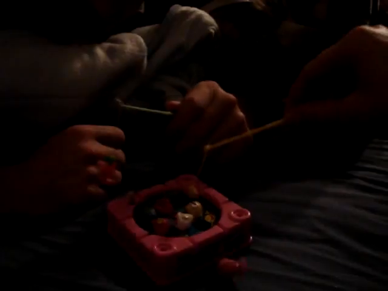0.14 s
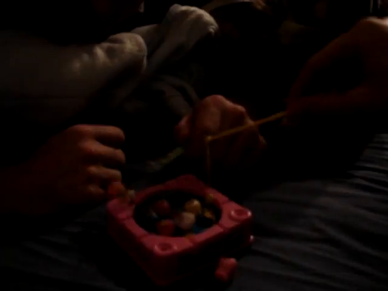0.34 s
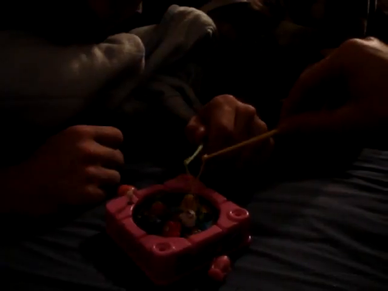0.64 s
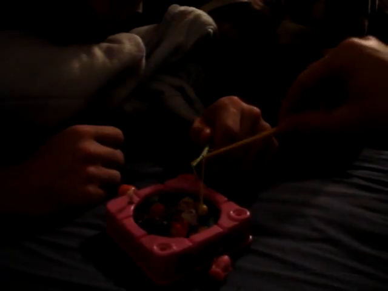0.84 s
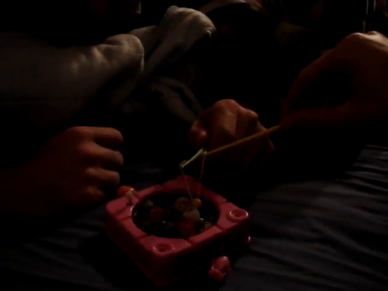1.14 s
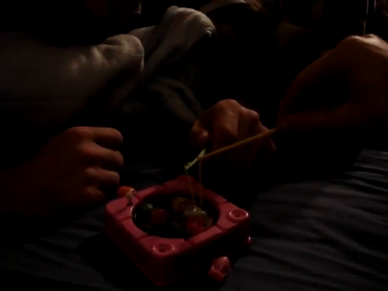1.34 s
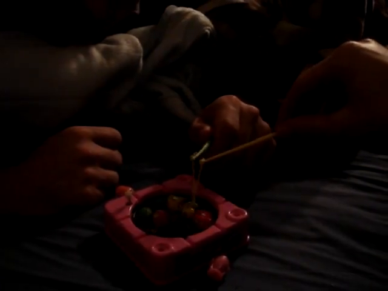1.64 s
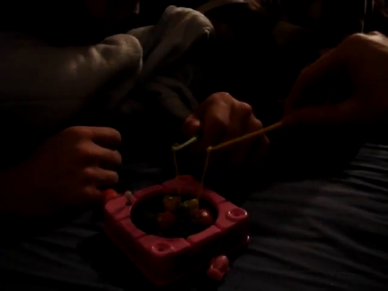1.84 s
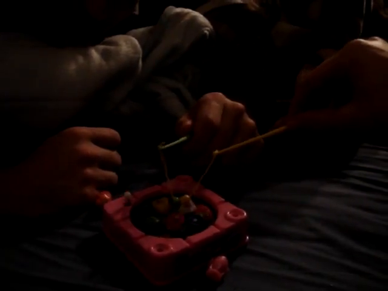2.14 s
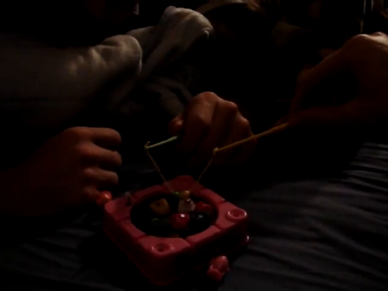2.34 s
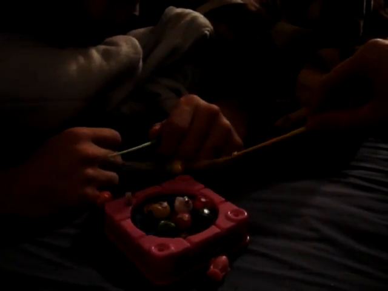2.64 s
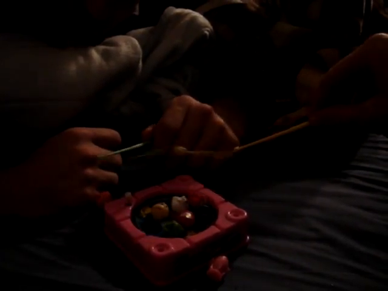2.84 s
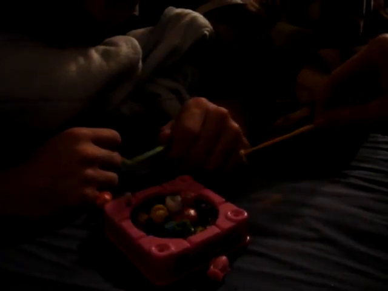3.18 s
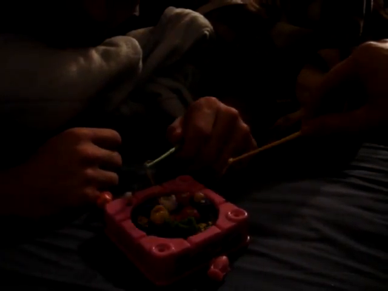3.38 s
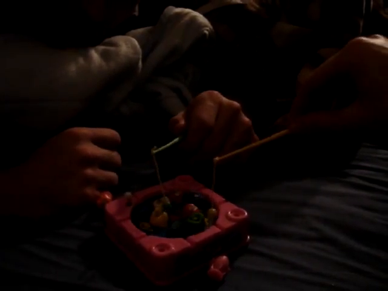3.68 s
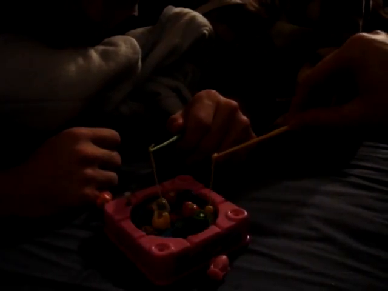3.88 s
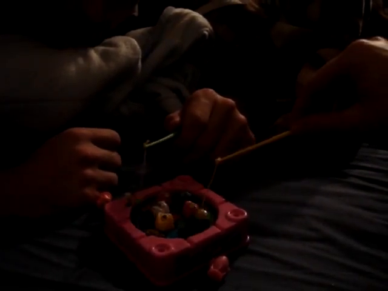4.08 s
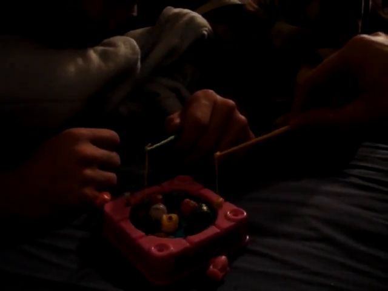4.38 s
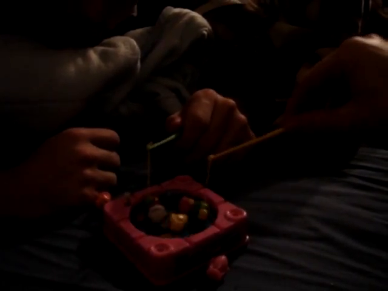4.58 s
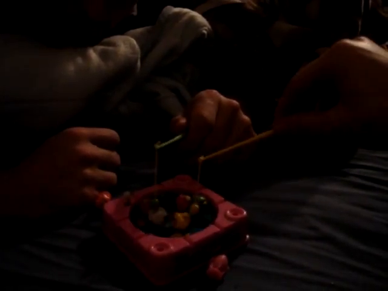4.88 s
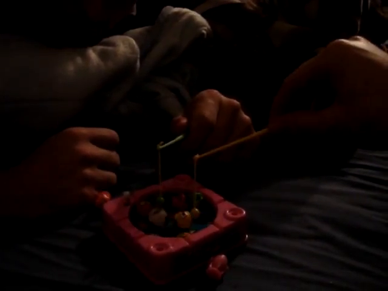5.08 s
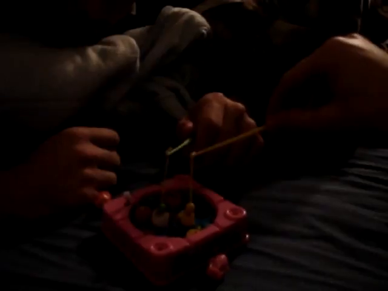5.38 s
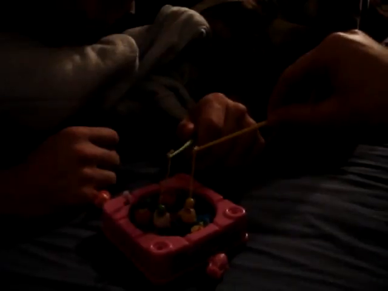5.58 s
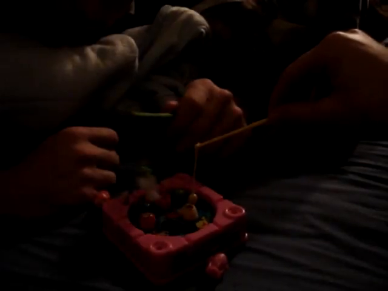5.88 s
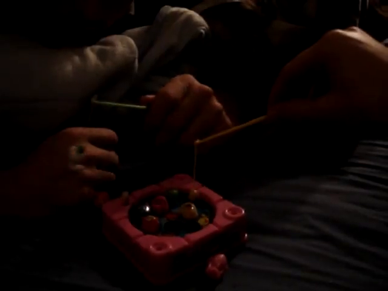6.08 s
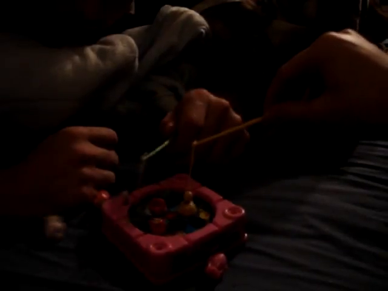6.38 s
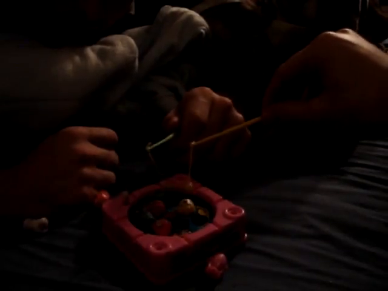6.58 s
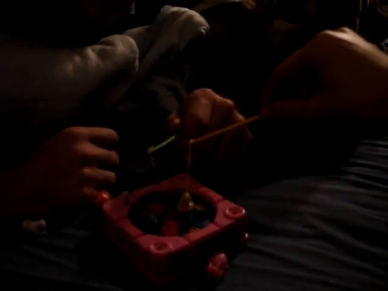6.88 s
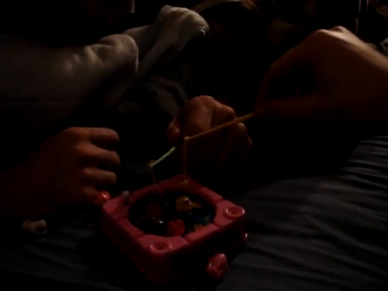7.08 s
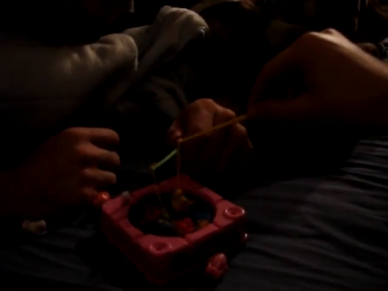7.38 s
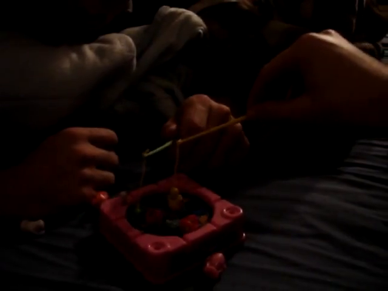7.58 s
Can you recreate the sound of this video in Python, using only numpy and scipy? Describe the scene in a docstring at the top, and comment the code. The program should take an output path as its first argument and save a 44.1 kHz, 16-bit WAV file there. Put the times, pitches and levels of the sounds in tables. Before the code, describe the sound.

Steady clockwork rattle of a small hollow plastic toy, beats so quick they merge into a gritty buzz with scraping gears and shifting metallic-plastic overtones. Toy fish and rods tap the case: a loud clack at once, sparse ticks through the middle, a few taps and a soft bump past six seconds. Close, mono, slightly dulled on top, with a short soft room and very faint hum.

```python
"""A bed in a quiet room, on which a wind-up plastic fishing toy runs.
Its spring motor is braked by a pallet that rattles against a toothed wheel about 150 times a second:
each beat is an impulse that rings the hollow case and the pond, modelled as banks of resonances.
Gears scrape between the beats as noise through resonances; further resonances swell and glide for a while.
Plastic fish and rods click on the turning pond as struck modes; below lie a rumble and a faint mains hum."""
import sys
import numpy as np
from scipy import signal
from scipy.fft import rfft, irfft, next_fast_len
from scipy.io import wavfile
from scipy.ndimage import uniform_filter1d

SR = 44100
rng = np.random.default_rng(int(sys.argv[2]) if len(sys.argv) > 2 else 0)


def unload_wav(signal):
    """Save mono or channel-first audio to the path in sys.argv[1] as 16-bit WAV at rate SR, clipped to [-1, 1]."""
    wavfile.write(
        sys.argv[1],
        SR,
        np.round(np.clip(np.atleast_2d(signal).T, -1, 1) * 32767).astype(np.int16),
    )


N = 340893
TIME = np.arange(N) / SR

# teeth that catch the pallet hard: (time [s], peak level [dB])
SNAG_EVENTS = [(0.722, -12), (1.6627, -9), (1.6998, -12), (1.724, -9.5), (2.1338, -9.5), (3.2042, -9.5),
               (4.0294, -11.5), (4.0517, -10), (4.542, -9.5), (5.6241, -12), (5.7772, -13), (6.314, -10),
               (7.2972, -12)]

# rms waver of the hum and of the drone, and its rate
HUM_WAVER_DB, HUM_WAVER_HZ = 2.5, 2.7
# rms wander of the motor's pace, and its rate
WANDER_BEATS_PER_S, WANDER_HZ = 2.5, 14
# alternate beats differ in force and timing (each way from the mean), every third one is accented
TICK_TOCK_DB, THIRD_TOOTH_DB, LIMP_S = 1.2, .9, .00006
# change of level for each beat per second above or below the mean pace
PALLET_SWING_DB, TEETH_SWING_DB, POND_SWING_DB, CASE_SWING_DB = .13, .12, .11, .07
TEETH_SWING_TOP = 16  # beats per s; in a faster surge the gears get no louder
# rms flutter of the level, and its rate
PALLET_FLUTTER_DB, TEETH_FLUTTER_DB, FLUTTER_HZ = 1.3, 1.5, 45
PALLET_WIDTH_HZ, PALLET_SCATTER_HZ, PALLET_CHATTER_DB = 640, 45, -6
GEAR_WIDTH_HZ, GEAR_DB, OTHER_TEETH_DB = 770, -4, -0.5
ECHO_CUT_HZ = 5200  # soft surfaces return little treble
ROOM_T60_S, ROOM_DB = .25, -13  # decay time of the tail; its level ahead of the treble loss
CUTOFF_HZ = 10080


def from_db(db):
    """Amplitude ratio of a level: 20 dB is a factor of ten."""
    return 10 ** (np.asarray(db) / 20)


def rms_one(x):
    """Normalise the mean power: scale to unit rms."""
    return x / np.sqrt(np.mean(x ** 2) + 1e-20)


def in_time(rows):
    """Linear interpolation of each column of a (time, values...) table at every sample."""
    s, *columns = np.transpose(rows)
    return [np.interp(TIME, s, column) for column in columns]


def clicks(times, sizes):
    """Ideal impulses: one sample of force at each given time."""
    return np.bincount(np.clip(times * SR, 0, N).astype(int), sizes, N + 1)[:N]


def response(modes, size=4096):
    """Minimum-phase impulse response of a set of resonances: it rings at once; unit energy."""
    bins = np.fft.rfftfreq(size, 1 / SR)
    power = sum(from_db(db) ** 2 / (1 + (2 * (bins - hz) / width) ** 4) for hz, width, db in modes)
    # folding the cepstrum onto positive time gives minimum phase
    cepstrum = irfft(np.log(power + 1e-9) / 2)
    cepstrum[1:size // 2] *= 2
    cepstrum[size // 2 + 1:] = 0
    ring = irfft(np.exp(rfft(cepstrum)))
    return ring / np.linalg.norm(ring)


def resonate(x, modes):
    """Linear response of a set of resonances: the force convolved with their impulse response."""
    return signal.oaconvolve(x, response(modes))[:len(x)]


def swept(x, hz, width):
    """Heterodyne resonance whose centre may move; about equal energy at any width."""
    carrier = np.exp(2j * np.pi * np.cumsum(hz * np.ones(N)) / SR)
    lowpass = signal.butter(2, width / 2, fs=SR, output="sos")
    body = signal.sosfilt(lowpass, x / carrier + 1e-18)
    return (body * carrier).real / np.sqrt(width)


def shaped_noise(spectrum):
    """Spectral shaping of white noise, with levels interpolated over log frequency; rms 1."""
    hz, db = np.transpose(spectrum)
    size = next_fast_len(N, True)
    bins = np.maximum(np.fft.rfftfreq(size, 1 / SR), 1e-3)
    gain = from_db(np.interp(np.log(bins), np.log(hz), db))
    white = rng.standard_normal(size)
    return rms_one(irfft(rfft(white) * gain, size)[:N])


def drift(hz):
    """Band-limited random modulation with little much faster than hz; rms 1."""
    return shaped_noise([(hz / 10, -20), (hz / 2, 0), (hz, 0), (hz * 2, -20), (hz * 10, -120)])


def chatter(hits, rise_s, fall_s):
    """Multiple contact: each hit sets off a burst of tiny contacts that builds and dies; rms 1."""
    burst = hits + 1e-18
    for seconds in (rise_s, fall_s):
        burst = signal.lfilter([1], [1, -np.exp(-1 / (seconds * SR))], burst)
    return rms_one(burst * rng.choice([-1, 1], N))


def even(x):
    """Steady power supply: the spring's even pull keeps the power near 1 over many beats."""
    return x / np.sqrt(np.abs(uniform_filter1d(x ** 2, size=4000)) + 1e-9)


def blow(modes, grit_s, grit_db, size=4000):
    """Impact excitation: a sharp contact and a little dying grit ring the modes; peak 1."""
    grit = rng.standard_normal(size) * np.exp(-np.arange(size) / SR / grit_s)
    force = from_db(grit_db) * grit / np.linalg.norm(grit)
    force[0] += 1
    sound = resonate(force, modes)
    return sound / np.abs(sound).max()


def add(out, s, sound):
    """Superposition: mix a short sound in at time s."""
    start = max(round(s * SR), 0)
    out[start:start + len(sound)] += sound[:max(N - start, 0)]


def mains_hum():
    """Sum of steady sine tones whose levels shift slowly and waver at random."""
    # mains and room hum: (frequency [Hz], mean level at first [dB rms], mean level at the end [dB rms])
    hum_tones = [(30, -68.5, -65.5), (60, -68, -67), (90, -65.5, -69), (120, -70.5, -61.5),
                 (181.7, -66.5, -64.5), (336.7, -64, -62)]
    hum = 0
    for hz, first_db, last_db in hum_tones:
        db = np.linspace(first_db, last_db, N) + HUM_WAVER_DB * drift(HUM_WAVER_HZ)
        tone = np.sin(2 * np.pi * (hz * TIME + rng.random()))
        hum = hum + from_db(db) * np.sqrt(2) * tone
    return hum


def low_rumble():
    """Broadband noise weighted to low frequencies: the running toy and the room."""
    # spectrum of the rumble: (frequency [Hz], relative density [dB per Hz])
    rumble_spectrum = [(15, -22), (28, -7), (42, -18.5), (90, -6), (140, -10), (220, -2.5), (290, -4.5),
                       (400, -5), (500, -2), (750, -7), (900, -6), (1500, -52)]
    # level of the rumble: (time [s], level [dB rms])
    rumble_level = [(0.0, -54), (2.6, -51.5), (4.8, -51.5), (7.73, -52.5)]
    return from_db(in_time(rumble_level)[0]) * shaped_noise(rumble_spectrum)


def bumps():
    """Damped impact: each dull bump on the bed rings one wide, low resonance."""
    # (time [s], peak level [dB], frequency [Hz])
    bump_events = [(0.089, -49, 250), (6.521, -33, 250)]
    out = np.zeros(N)
    for s, db, hz in bump_events:
        add(out, s, from_db(db) * blow([(hz, 240, 0)], grit_s=.012, grit_db=-5))
    return out


def hook_drags():
    """Stick-slip friction: a hook slides over the fish in a dense run of tiny slips."""
    # (middle time [s], length [s], level [dB])
    drag_events = [(3.449, .045, -32), (0.415, .05, -35)]
    # resonances of a dragging hook: (frequency [Hz], width [Hz], level [dB])
    hook_modes = [(1920, 380, 0), (3000, 1200, -13), (5850, 500, -6)]
    slips = rng.standard_normal(N) * (rng.random(N) < 1500 / SR)  # 1500 slips per s on average
    pressure = 0
    for s, length, db in drag_events:
        pressure = pressure + from_db(db) * np.exp(-(2 * (TIME - s) / length) ** 4)
    return pressure * rms_one(resonate(slips, hook_modes))


def hook_ticks():
    """Impact of a light body: each hook tick rings a narrow high mode over a faint wide one."""
    # (time [s], peak level [dB], ring frequency [Hz])
    tick_events = [(0.4339, -14, 5710), (2.5888, -13, 6000), (3.2195, -15, 6043), (3.252, -18, 6300),
                   (3.436, -20, 5840), (3.554, -14.5, 6070), (5.003, -12, 5940), (6.3145, -17.5, 5805),
                   (7.0861, -15, 5702)]
    out = np.zeros(N)
    for s, db, hz in tick_events:
        add(out, s, from_db(db) * blow([(hz, 520, 0), (7000, 2500, -15)], grit_s=.002, grit_db=-8))
    return out


def knocks():
    """Modal excitation by impact: fish and rods ring the struck piece, thud in the case and may crack."""
    # (time [s], ring peak [dB], ring frequency [Hz], ring width [Hz], case thud peak [dB], crack peak [dB])
    knock_events = [(0.09, -5, 2360, 1210, -32, -9), (0.0972, -12, 2670, 900, -43, -45),
                    (0.1194, -21, 2230, 700, -22, -18), (0.122, -16.5, 2230, 500, -32, -43),
                    (0.392, -14, 2820, 480, -22, -16), (1.8247, -16, 1850, 360, -34, -45),
                    (1.8369, -15, 1950, 359.7, -31, -28), (2.683, -13, 1920, 330, -43, -45),
                    (3.2513, -15.5, 2130, 420, -31, -8), (3.2686, -18, 2075, 360, -25, -26),
                    (3.4353, -21, 1900, 330.8, -43, -45), (3.448, -21, 1901, 330, -29, -40),
                    (3.4675, -20, 2860, 700, -20, -45), (3.5542, -18.5, 2100, 360, -33, -16),
                    (4.0619, -13, 1900, 330, -38, -45), (5.447, -18, 2548, 800, -23, -26),
                    (5.478, -21, 2637, 700, -28, -45), (5.5421, -24, 1880, 550, -29, -30),
                    (6.324, -17, 2900, 1201, -27, -27), (6.588, -18.5, 1791, 330, -22.5, -30),
                    (6.5982, -34, 2584, 700, -27, -43), (7.0854, -23, 2104, 500.3, -26, -15),
                    (7.101, -28, 2102, 399.6, -26, -45), (7.3625, -34, 1700, 500, -24.5, -45)]
    # what a knock rings in the case: (frequency [Hz], width [Hz], level [dB])
    thud_modes = [(470, 370, -29.5), (879, 54, 1.5), (1026, 160, 0.5), (1390, 470, 0.5)]
    crack_modes = [(2800, 1100, -8), (3900, 1800, -6)]
    out = np.zeros(N)
    for s, db, hz, width, thud_db, crack_db in knock_events:
        ring_modes = [(hz, width, 0), (2600, 1600, -22)]
        add(out, s, from_db(db) * blow(ring_modes, grit_s=.002, grit_db=-17))
        add(out, s, from_db(thud_db) * blow(thud_modes, grit_s=.007, grit_db=-3))
        add(out, s, from_db(crack_db) * blow(crack_modes, grit_s=.001, grit_db=-3))
    return out


def snags():
    """Impact excitation: a tooth that catches the pallet hard snaps its resonances."""
    snap_modes = [(4330, 520, 0), (3400, 700, -17), (7340, 1200, -20)]
    out = np.zeros(N)
    for s, db in SNAG_EVENTS:
        add(out, s, from_db(db) * blow(snap_modes, grit_s=.0012, grit_db=-13))
    return out


def drone(pace):
    """Harmonic and subharmonic forcing: beats shake the whole case in low tones that follow the pace."""
    # low tones of the shaking case: (multiple of the beat rate [ratio], mean relative level [dB])
    drone_tones = [(1, 0), (1.5, -3.5), (2, -8)]
    # level of a tone at 0 dB: (time [s], level [dB rms])
    drone_level = [(0.0, -68), (3.3, -66), (3.65, -58), (4.1, -65), (4.9, -61.5), (5.6, -63), (7.0, -69.5),
                   (7.5, -62)]
    phase = 2 * np.pi * np.cumsum(pace) / SR
    tones = 0
    for multiple, db in drone_tones:
        waver_db = HUM_WAVER_DB * drift(HUM_WAVER_HZ)
        tones = tones + from_db(db + waver_db) * np.sin(multiple * phase)
    return from_db(in_time(drone_level)[0]) * np.sqrt(2) * tones


def passing_resonances(times, sizes):
    """Forced resonance: modes of case, pond, pallet and nearby hollows, tapped by the beats, swell and glide."""
    # (middle time [s], length [s], level [dB], frequency at the middle [Hz], glide [Hz per s], width [Hz])
    resonance_events = [(1.8, 1.8, -39, 2010, 3, 270), (2.94, 0.54, -48.5, 499.6, -150, 119),
                        (2.9, 0.59, -55, 340, 0, 141), (3.076, 0.93, -37.5, 7270, -2, 598),
                        (0.92, 0.73, -37, 3230, -2, 270), (1.16, .5, -40, 4200, 0, 200),
                        (2.7, 0.56, -46, 8750, 0, 470), (2.98, 0.75, -38, 3470, -1, 220),
                        (4.79, 1.95, -44, 1667, -300, 270), (4.88, 1.9, -42.5, 2680, -1, 120),
                        (4.9, 1.5, -48, 2545, 0, 84), (5.15, 0.56, -33, 3565, -100, 378),
                        (4.77, .6, -56.5, 190, -1, 110), (5.02, 0.13, -37, 5100, 0, 590),
                        (6.241, 0.34, -51.5, 479.5, -100, 149), (6.1, 0.28, -30.5, 4160, -3, 340),
                        (7.2, 0.46, -32.5, 3600, 300, 210), (7.7, 0.35, -37, 3880, 0, 199),
                        (3.846, 0.56, -41.5, 1800, -100, 110), (6.82, 1.4, -42.5, 2068, 1, 250),
                        (7.05, .7, -41.5, 3280, 0, 320), (4.45, .25, -56, 635, 0, 36)]
    out = 0
    for s, length, db, hz, glide, width in resonance_events:
        swell = np.exp(-(2 * (TIME - s) / length) ** 2)
        late = .0003 + .3 / hz * rng.standard_normal(N // 100)[:len(times)]
        taps = clicks(times + late, np.sqrt(sizes))
        ring = rms_one(swept(taps, hz + glide * (TIME - s), width))
        out = out + from_db(db) * swell * ring
    return out


def pallet_beats(pace, jitter_s, uneven_db):
    """Escapement: one uneven beat per passing tooth, limping, every third accented; (times, sizes)."""
    turned = np.cumsum(pace) / SR  # teeth passed so far
    times = np.interp(np.arange(.5, turned[-1]), turned, TIME)
    late, strong = rng.standard_normal((N // 100, 2))[:len(times)].T
    tooth = np.arange(len(times))
    sides = (-1) ** tooth
    accent_db = TICK_TOCK_DB * sides + THIRD_TOOTH_DB * np.cos(2 * np.pi * tooth / 3)
    chance_db = uneven_db * np.clip(strong, -2.5, 1.2)
    # a snagged tooth takes the place of the ordinary beat
    gaps = np.abs(times[:, None] - np.array(SNAG_EVENTS)[:, 0])
    free = gaps.min(axis=1) > .0035
    return times + LIMP_S * sides + jitter_s * late, free * from_db(accent_db + chance_db)


def rattle(beats, modes, fall_s, chatter_db, scrape_db, vary_db):
    """Impact and friction: each beat rings the modes and chatters, sliding teeth scrape steadily."""
    times, sizes = beats
    chance = rng.standard_normal((N // 100, 2 * len(modes) + 1))[:len(times)]
    sizes = sizes * from_db(vary_db * np.tanh(chance[:, -1]))
    # every tooth lands a little differently and shares its energy among the modes in its own way
    shares = (1 + .5 * chance[:, :len(modes)]) * from_db(np.array(modes)[:, 2])
    shares /= np.linalg.norm(shares, axis=1, keepdims=True)
    rings = 0
    for k, (hz, width, db) in enumerate(modes):
        slip = chance[:, len(modes) + k] / hz / 2  # about half a period either way
        rings = rings + swept(clicks(times + slip, sizes * shares[:, k]), hz, width)
    grit = chatter(clicks(times - .0005, sizes), rise_s=.0008, fall_s=fall_s)
    friction = from_db(chatter_db) * grit + from_db(scrape_db) * rng.standard_normal(N)
    return even(rms_one(rings) + resonate(friction, modes))


def shaken_case(times, sizes):
    """Structure-borne sound: the shake rings the hollow case a moment after the beat; unit power."""
    # (frequency [Hz], width [Hz], level [dB])
    case_modes = [(995, 147, -7), (1219, 155, -6.5), (1446, 188, -4.5), (1674, 177, -5), (1946, 227, -1),
                  (2155, 330, -2)]
    return rattle((times + .0006, sizes), case_modes, fall_s=.0012, chatter_db=-3, scrape_db=-2, vary_db=.5)


def shaken_pond(times, sizes):
    """Modal response to repeated impacts: the beats ring the turning pond; unit power."""
    # (frequency [Hz], width [Hz], level [dB])
    pond_modes = [(2410, 183, -12.5), (2559, 117, -8.5), (2718, 128, -7.5), (2949, 190, -6),
                  (3175, 158, -3), (3430, 260, -1), (3720, 190, -2.5)]
    return rattle((times - .0002, sizes), pond_modes, fall_s=.0016, chatter_db=0, scrape_db=-9, vary_db=1.2)


def gear_teeth(times, sizes):
    """Gear mesh excitation: bright chatter of the train, with one gear's moving resonance."""
    # (frequency [Hz], width [Hz], level [dB])
    teeth_modes = [(5540, 1380, -2.5), (7270, 1800, -8.5), (8560, 980, -4.5), (9617, 450, -6.5)]
    # the brightest gear's ring shifts as the pond turns: (time [s], frequency [Hz])
    gear_hz = [(0.0, 6700), (0.3, 7030), (2.04, 7160), (2.39, 6732), (2.69, 7190), (3.96, 6990),
               (4.43, 7460), (4.67, 7100), (6.52, 7080), (6.67, 7400), (7.21, 6814), (7.73, 7097)]
    train = rattle((times - .0002, sizes), teeth_modes, fall_s=.0015, chatter_db=12, scrape_db=-1, vary_db=1.8)
    grit = chatter(clicks(times - .0007, sizes), rise_s=.0008, fall_s=.0018)
    gear = even(swept(grit, in_time(gear_hz)[0], GEAR_WIDTH_HZ))
    return from_db(OTHER_TEETH_DB) * train + from_db(GEAR_DB) * gear


def pallet_ticks(times, sizes):
    """Impulse response of one resonance: a short, rounded ping per beat amid chatter; unit power."""
    # resonances of the chatter: (frequency [Hz], width [Hz], level [dB])
    pallet_modes = [(4050, 430, -7.5), (4410, 600, -1.5), (4850, 320, -5)]
    # the ping's mean pitch shifts as the pond turns: (time [s], frequency [Hz])
    pallet_hz = [(0.0, 4280), (1.7, 4230), (2.2, 4430), (3.3, 4300), (4.0, 4280), (5.0, 4280), (6.1, 4300),
                 (6.5, 4390), (7.7, 4300)]
    ring_hz = in_time(pallet_hz)[0] + PALLET_SCATTER_HZ * drift(100)
    ping = rms_one(swept(clicks(times - .0001, sizes), ring_hz, PALLET_WIDTH_HZ))
    grit = chatter(clicks(times - .0005, np.sqrt(sizes)), rise_s=.0008, fall_s=.002)
    return even(ping + from_db(PALLET_CHATTER_DB) * resonate(grit, pallet_modes))


def motor():
    """Common excitation by one train of beats; pallet, case, pond and, to a limit, teeth swell with the pace."""
    # the motor surges and sags with its load: (time [s], mean pace [pallet beats per s])
    motor_speed = [(0.05, 138), (0.22, 145), (0.28, 155), (0.34, 144), (0.88, 149.5), (0.98, 160),
                   (1.13, 138), (1.26, 156), (1.32, 137), (1.45, 165), (1.51, 144), (1.73, 164),
                   (1.84, 147), (1.94, 175), (2.02, 159), (2.15, 161), (2.18, 145), (2.36, 143),
                   (2.42, 161), (2.54, 141), (2.62, 157), (2.75, 160), (3.13, 162), (3.29, 145),
                   (3.35, 158), (3.43, 145), (3.66, 137), (3.77, 151), (3.93, 151), (4.06, 169),
                   (4.11, 152), (4.33, 151), (4.39, 136), (4.54, 145), (4.73, 134), (4.81, 161),
                   (4.89, 149), (5.06, 153), (5.12, 151), (5.23, 150), (5.29, 161), (5.37, 135),
                   (5.54, 148), (5.66, 120), (5.73, 141), (5.9, 131), (6.07, 160), (6.18, 147), (6.33, 146),
                   (6.4, 140), (6.51, 148), (6.56, 155), (6.6, 139), (6.79, 122), (6.85, 143), (7.0, 124),
                   (7.09, 143), (7.37, 147), (7.6, 151), (7.68, 147)]
    # force of the beats, ahead of swing and flutter: (time [s], level [dB])
    beat_force = [(0.0, -29.5), (0.21, -33), (0.67, -32.5), (0.73, -32.5), (0.79, -33), (0.85, -30.5),
                  (1.25, -30.5), (1.35, -31), (1.6, -28.5), (1.69, -28), (1.78, -30), (2.05, -30),
                  (2.3, -30.5), (3.11, -31), (3.22, -28.5), (3.75, -29.5), (4.01, -29.5), (4.45, -32.5),
                  (4.95, -29.5), (5.06, -31), (5.53, -28.5), (5.92, -31.5), (6.08, -28), (6.2, -32),
                  (6.3, -27.5), (6.335, -35), (6.55, -32.5), (7.0, -32.5), (7.3, -31.5), (7.61, -30),
                  (7.73, -28.5)]
    # parts as the pond turns and the fish lift, ahead of swing, mesh and flutter:
    # (time [s], case level [dB], pond level [dB], gear teeth level [dB])
    part_levels = [(0.0, -38.5, -31, -35), (0.21, -43.5, -39.5, -40), (0.29, -40.5, -35.5, -36),
                   (1.0, -40, -33, -36), (1.78, -39, -35, -36), (3.19, -37, -33.5, -35),
                   (3.51, -36.5, -35, -35), (4.07, -37.5, -33.5, -36.5), (4.45, -38.5, -34.5, -35.5),
                   (4.57, -40.5, -32, -35), (5.48, -37.5, -32, -35.5), (5.59, -39, -34.5, -36),
                   (6.5, -40.5, -34, -36), (6.65, -38.5, -32.5, -34), (7.18, -40.5, -33.5, -35),
                   (7.73, -37.5, -31, -36.5)]
    # gears mesh harder once per turn of each wheel: (turn rate [Hz], time of one crest [s], swell [dB])
    wheel_swells = [(2.89, 0.31, .25), (3.945, 0.218, .5)]
    pace = in_time(motor_speed)[0] + WANDER_BEATS_PER_S * drift(WANDER_HZ)
    swing = pace - uniform_filter1d(pace, size=48000)  # departure from the mean over about a second
    pallet_db, = in_time(beat_force)
    case_db, pond_db, teeth_db = in_time(part_levels)
    mesh_db = sum(db * np.cos(2 * np.pi * hz * (TIME - crest)) for hz, crest, db in wheel_swells)
    times, sizes = pallet_beats(pace, jitter_s=.00019, uneven_db=1.9)
    pallet_db = pallet_db + PALLET_SWING_DB * swing + PALLET_FLUTTER_DB * drift(FLUTTER_HZ)
    teeth_db = teeth_db + TEETH_SWING_DB * np.minimum(swing, TEETH_SWING_TOP)
    teeth_db = teeth_db + mesh_db + TEETH_FLUTTER_DB * drift(FLUTTER_HZ)
    out = from_db(pallet_db) * pallet_ticks(times, sizes)
    out += from_db(teeth_db) * gear_teeth(times, np.sqrt(sizes))
    out += from_db(pond_db + POND_SWING_DB * swing) * shaken_pond(times, sizes)
    out += from_db(case_db + CASE_SWING_DB * swing) * shaken_case(times, sizes)
    return out + passing_resonances(times, sizes) + drone(pace)


def room(x):
    """Room acoustics: a few early reflections and the short exponential tail of a furnished room."""
    # nearby surfaces: (delay [s], level ahead of the treble loss [dB])
    echo_paths = [(.0083, -21), (.00865, -16.5), (0.011, -19), (0.0148, -18)]
    early = sum(from_db(db) * np.interp(TIME - delay, TIME, x, left=0) for delay, db in echo_paths)
    early = signal.sosfiltfilt(signal.butter(2, ECHO_CUT_HZ, fs=SR, output="sos"), early)
    t = TIME[:SR // 2]
    tail = rng.standard_normal(len(t)) * from_db(-60 * t / ROOM_T60_S) * (t > .006)
    tail = tail / np.linalg.norm(tail)
    tail = signal.sosfilt(signal.butter(1, 5000, fs=SR, output="sos"), tail)
    return x + early + from_db(ROOM_DB) * signal.fftconvolve(x, tail)[:N]


def scene():
    """Superposition: the toy heard through its room, over the hum and rumble."""
    background = low_rumble() + mains_hum()
    toy = bumps() + hook_drags() + hook_ticks() + knocks() + snags() + motor()
    return (room(toy) + background)[None]


def record(dry):
    """Band limiting: a steep elliptic low-pass cuts the top."""
    lowpass = signal.ellip(12, .2, 90, CUTOFF_HZ, fs=SR, output="sos")
    return signal.sosfilt(lowpass, dry)


dry = scene()
out = record(dry)
unload_wav(out)
```